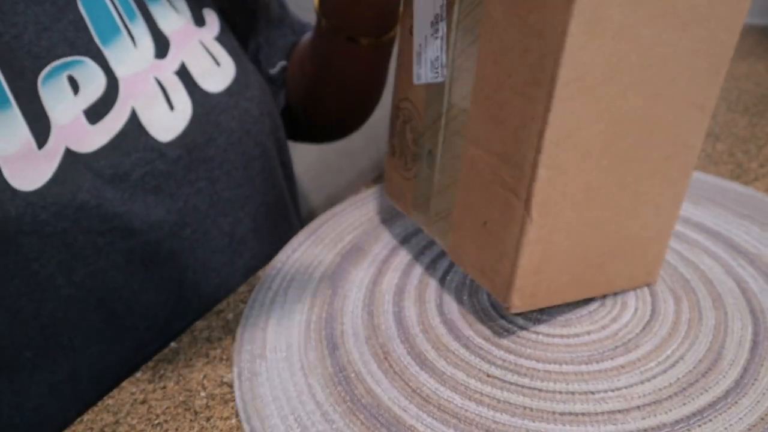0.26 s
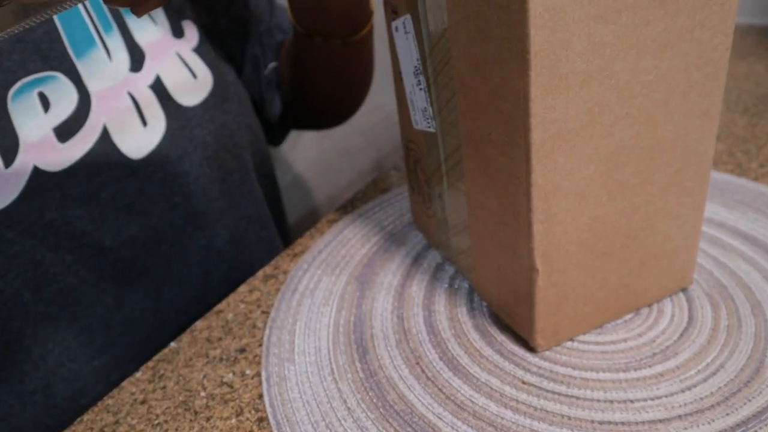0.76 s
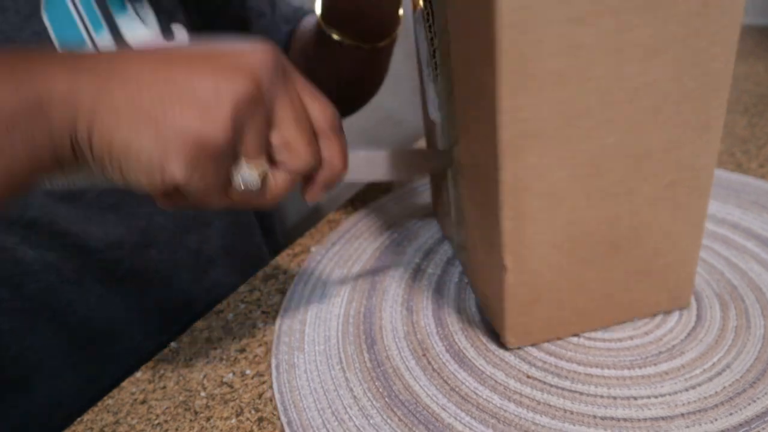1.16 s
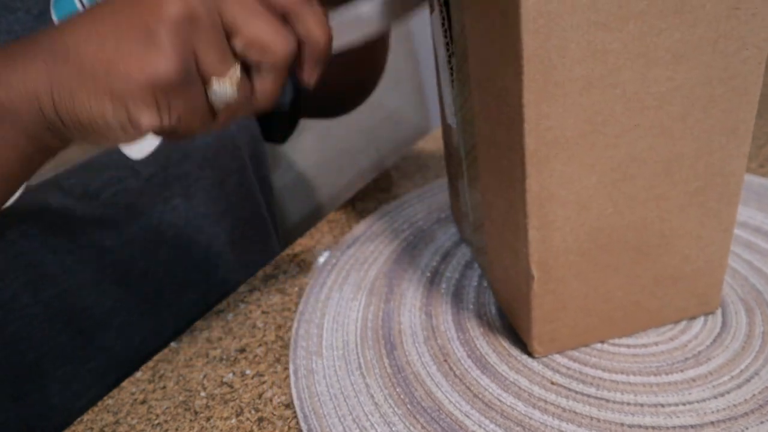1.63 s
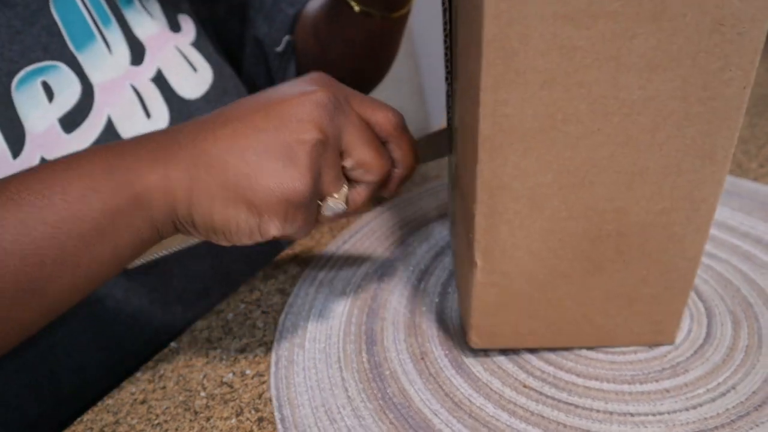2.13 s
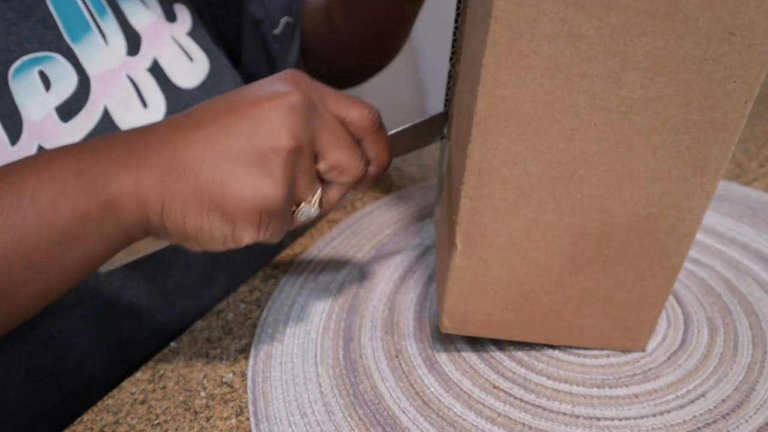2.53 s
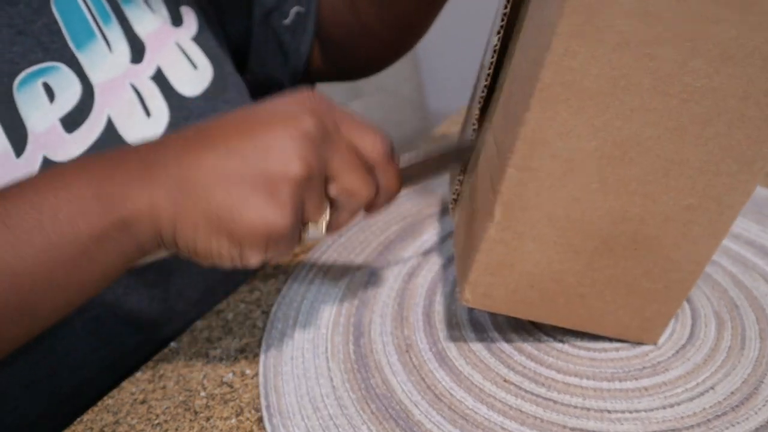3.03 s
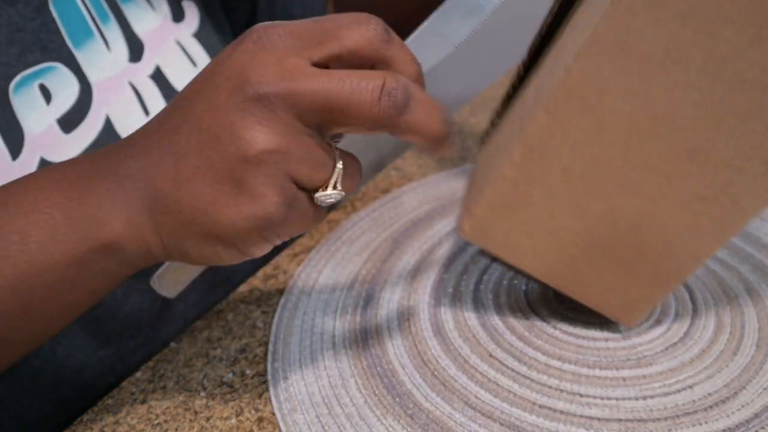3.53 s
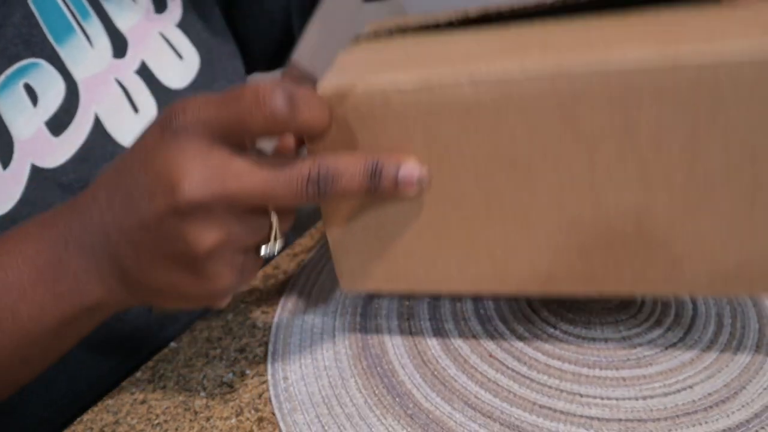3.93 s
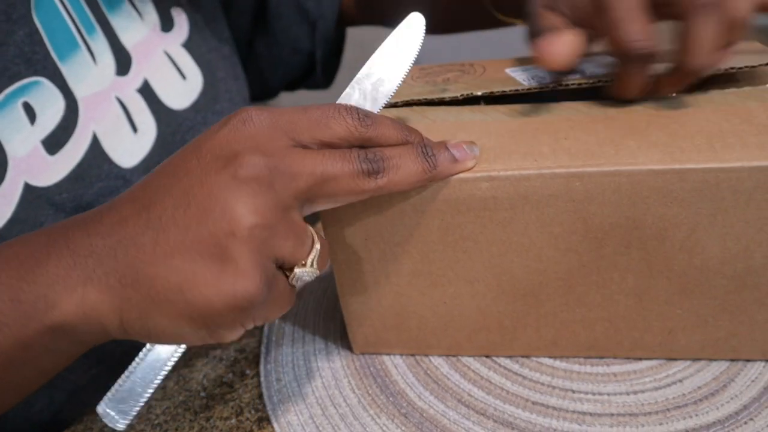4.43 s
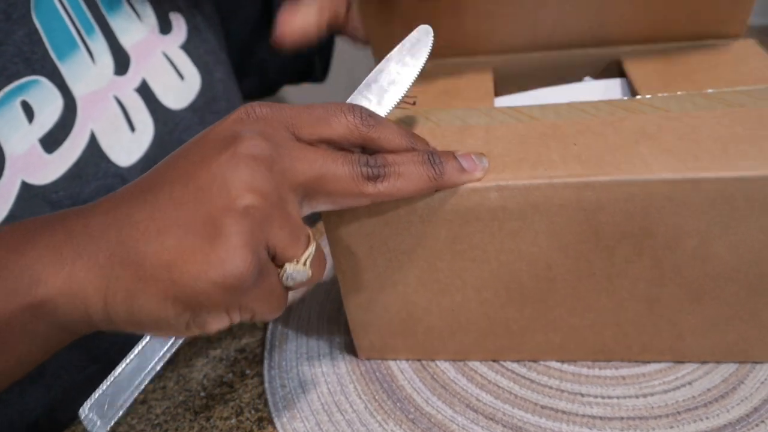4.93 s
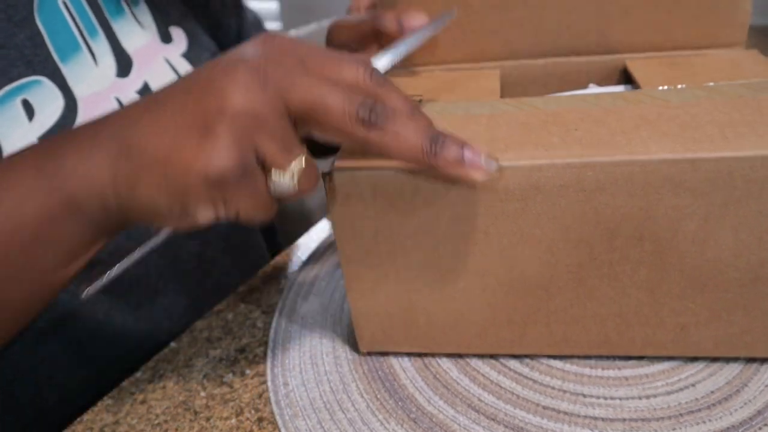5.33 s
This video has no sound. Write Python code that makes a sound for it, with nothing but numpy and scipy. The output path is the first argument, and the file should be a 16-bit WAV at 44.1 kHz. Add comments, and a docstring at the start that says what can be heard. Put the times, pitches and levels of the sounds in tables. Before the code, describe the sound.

Close cardboard rasping, tape crackling and hollow knocks as a box is cut open on a table and its flaps pried up.

```python
"""A cardboard box on a table mat has its packing tape slit with a knife, is laid down and pulled open.
Rubbing and knocks make the air inside and the card walls ring, and the box thuds on the table.
On top come the card's rasp and grainy swells, while the tape's glue and fibres crackle and snap.
The room is small and furnished; a close stereo microphone overloads on the hardest blows."""
import sys
import numpy as np
from scipy import signal
from scipy.fft import rfft, irfft, next_fast_len
from scipy.io import wavfile

SR = 44100
rng = np.random.default_rng(int(sys.argv[2]) if len(sys.argv) > 2 else 0)


def transcribe(u):
    """Save the signal u as a 16-bit wav file named by the first command-line argument.

    u: samples, shape (n,) or (channels, n), limited to [-1, 1]; the rate is SR.
    q: integer samples, one column per channel.
    """
    v = np.clip(np.atleast_2d(u).T, -1, 1)
    q = np.round(v * 32767).astype(np.int16)
    wavfile.write(sys.argv[1], SR, q)


N = 246519

# Tones of the hollow inside the box: pitch_hz, level_db, ring_s (time to fade by 60 dB)
HOLLOW_TONES = [(117, -15.5, 0.11), (157.3, -12.5, 0.19), (218.2, -5, 0.44), (292.7, 0, 0.17),
                (297, 8, 0.068), (356, 4.5, 0.016), (427, -6.5, 0.023)]
# Tones of the card walls: pitch_hz, level_db, ring_s
WALL_TONES = [(553, 8.5, 0.026), (612, -8, 0.054), (686, 8.5, 0.035), (815, 7.5, 0.028), (871, 7, 0.022),
              (978.4, 8.5, 0.022), (1229, -0.5, 0.033), (1097, 5, 0.014), (1391, -3, 0.025),
              (2300, -7.5, 0.072)]


def from_db(db):
    """Turn decibels into a number to multiply by."""
    return 10 ** (np.asarray(db) / 20)


def rms_one(x):
    """Scale a sound so that its average level (rms) is 1."""
    return x / np.sqrt(np.mean(x ** 2) + 1e-20)


def colour(x, curve, lag_s=0):
    """Turn lows and highs up or down along a curve of (pitch_hz, level_db); delay by lag_s."""
    size = next_fast_len(N + SR // 2)
    hz = np.arange(1, size // 2 + 2) * SR / size
    curve_hz, curve_db = np.transpose(curve)
    gain = from_db(np.interp(np.log(hz), np.log(curve_hz), curve_db))
    delay = np.exp(-2j * np.pi * hz * lag_s)
    return irfft(rfft(x, size) * gain * delay, size)[..., :N]


def cut(x, side, hz):
    """Filter a sound, keeping the "low" or the "high" side of hz."""
    return signal.sosfilt(signal.butter(2, hz, side, fs=SR, output="sos"), x)


def ring(force, hz, ring_s):
    """Each push starts a tone that dies away."""
    decay = from_db(-60 / (max(ring_s, .002) * SR))
    turn = 2 * np.pi * hz / SR
    return signal.lfilter([0, np.sin(turn)], [1, -2 * decay * np.cos(turn), decay ** 2], force + 1e-18)


def slips(per_s, spread_db, clump_db, clump_hz):
    """Surfaces stick and slip, making uneven clicks that come in clumps."""
    sizes = from_db(spread_db * np.minimum(rng.exponential(1, N), 4)) * rng.choice([-1, 1], N)
    clicks = sizes * (rng.random(N) < per_s / SR)
    smooth = np.exp(-2 * np.pi * clump_hz / SR)
    drift = signal.lfilter([1], [1, -2 * smooth, smooth ** 2], rng.standard_normal(N + SR))[SR:]
    return rms_one(clicks * from_db(clump_db * rms_one(drift)))


def burst(noise, start_s, peak_db, hz, spread):
    """Keep the noise from about hz / spread to hz * spread and place it at its start time."""
    band = signal.butter(2, [hz / spread, min(hz * spread, SR / 2.5)], "band", fs=SR)
    sound = signal.lfilter(*band, noise)
    sound *= from_db(peak_db) / np.abs(sound).max()
    return np.pad(sound, ((0, 0), (round(start_s * SR), N)))[:, :N]


def struck(start_s, strength_db, tones, ring_share, soft_hz):
    """Blows ring every tone unevenly; the gripping hand cuts the ring time to ring_share."""
    starts = np.round(start_s * SR).astype(int)
    scatter_db = 2.5 * rng.standard_normal((len(starts), len(tones)))
    out = np.zeros(N)
    for k, (hz, db, ring_s) in enumerate(tones):
        lag = round(0.31 / hz * SR)   # a tone answers 0.31 of a cycle late
        clicks = np.zeros(N)
        clicks[starts + lag] = from_db(strength_db + db + scatter_db[:, k])
        out += ring(clicks, hz, ring_s * ring_share)
    return cut(out, "low", soft_hz)   # soft card dulls the blow


def room_tone():
    """The steady air of the house, alike left and right in the bass."""
    # Colour of the air: pitch_hz, level_db
    air_curve = [(15, -46), (25, 5.5), (68, 5.5), (134, 1), (262, 7), (631, -6), (1200, -26), (12000, -52),
                 (14000, -95)]
    middle, side = rng.standard_normal((2, N))
    side = colour(side, [(100, -25), (1000, -6), (8000, 0)])
    return from_db(-38.5) * rms_one(colour(middle + side * np.array([[1], [-1]]), air_curve))


def stroke_levels():
    """Each stroke swells, sags and fades. Gives dB over time for hollow, walls, rasp and crackle."""
    # Strokes of blade or hand: start_s, swell_s, hold_s, walls_db, hollow_vs_walls_db, crackle_vs_walls_db
    strokes = [(0.0, 0.00035, 0.0074, -35.5, 3.5, -3.5), (0.273, 0.011, 0.2, -38.5, -9, -5.5),
               (0.436, 0.1, 0.003, -28.5, -5, -6), (0.739, 0.063, 0.036, -44, 9, 0),
               (0.932, 0.023, 0.054, -38, 9, 5.5), (1.111, 0.02, 0.017, -14.5, 3, -4),
               (1.225, 0.024, 0.12, -24.5, -8, -7.5), (1.435, 0.021, 0.011, -39, 7, -11.5),
               (1.546, 0.049, 0.2, -59.5, -9, 15), (1.696, 0.12, 0.14, -22, 0, -5.5),
               (2.122, 0.038, 0.08, -34, -3, -7), (2.326, 0.028, 0.077, -35.5, -1, -7),
               (2.535, 0.027, 0.0057, -22, -10, -7), (2.651, 0.015, 0.086, -20, -2, -22.5),
               (2.733, 0.065, 0.026, -24, -14, -16), (2.975, 0.0038, 0.038, -33.5, 12.5, -21),
               (3.023, 0.051, 0.098, -21, 1, -5.5), (3.22, 0.014, 0.062, -30, -1, -15.5),
               (3.305, 0.13, 0.14, -34, 4, -6), (3.758, 0.015, 0.087, -34.5, 5, -6.5),
               (3.922, 0.05, 0.25, -35, 6, -6), (4.069, 0.014, 0.033, -24, 5, -11.5),
               (4.232, 0.084, 0.2, -29, 3, -7.5), (4.425, 0.12, 0.15, -28, -1, -13),
               (4.655, 0.063, 0.11, -35, 3.5, -5), (4.899, 0.028, 0.082, -27.5, -3, -3),
               (5.059, 0.013, 0.0086, -26, -2.5, -10), (5.189, 0.0065, 0.14, -52.5, -17, 11),
               (5.299, 0.024, 0.12, -33.5, -2, -1.5), (5.527, 0.035, 0.13, -37, 0, -4)]
    # Hands never lie quite still: hollow_db, walls_db, rasp_db, crackle_db
    resting_db = [-73, -48.5, -51.5, -62]
    swell_db, sag_db_per_s, fade_db_per_s = 19, 47.5, 199
    start_s, swell_s, hold_s, walls_db, hollow_vs_walls_db, crackle_vs_walls_db = np.transpose(strokes)
    steps = np.arange(0, N + 64, 64)   # one level every 64 samples
    since_peak_s = steps / SR - (start_s + swell_s)[:, None]
    held_s = np.clip(since_peak_s, 0, hold_s[:, None])
    shape_db = swell_db * np.minimum(since_peak_s, 0) / np.maximum(swell_s, .003)[:, None]
    shape_db -= sag_db_per_s * held_s
    shape_db -= fade_db_per_s * np.maximum(since_peak_s - held_s, 0)
    rasp_db = walls_db - 4 + 0.26 * crackle_vs_walls_db   # the rasp partly follows the crackle
    peaks_db = np.array([walls_db + hollow_vs_walls_db, walls_db, rasp_db, walls_db + crackle_vs_walls_db])
    powers = from_db(2 * peaks_db) @ from_db(2 * shape_db) + from_db(2 * np.array(resting_db))[:, None]
    return [np.interp(np.arange(N), steps, 10 * np.log10(power)) for power in powers]


def rubbing(tones, level_db, per_s, spread_db):
    """Rubbing rings the box; each tone sits elsewhere on the card, so slips reach it at its own time."""
    force = slips(per_s, spread_db, clump_db=2.2, clump_hz=35)
    sound = 0
    for shift, (hz, db, ring_s) in zip(rng.integers(0, 60, len(tones)), tones):
        sound += from_db(db) * rms_one(ring(np.roll(force, shift), hz, ring_s))
    return from_db(level_db) * rms_one(sound)


def seam_clicks(curve, per_s, spread_db, width):
    """Tiny clicks in short tufts, spread left and right along the taped seam."""
    middle, ends = (slips(per_s, spread_db, clump_db=2.8, clump_hz=70) for _ in range(2))
    return rms_one(colour(middle + width * ends * np.array([[1], [-1]]), curve))


def card_rasp(level_db):
    """The surface of the card rasps as blade or hand drags over it."""
    # Colour of the rasp: pitch_hz, level_db
    rasp_curve = [(700, -58), (1200, 0), (2000, -1.5), (3200, -7.5), (5000, -14), (9000, -31.5)]
    return from_db(level_db) * seam_clicks(rasp_curve, per_s=1500, spread_db=2, width=0.98)


def tape_crackle(level_db):
    """Glue and fibres let go in thousands of bright clicks."""
    # Colour of the crackle: pitch_hz, level_db
    crackle_curve = [(500, -24), (2000, 7.5), (4500, 7), (7000, -5), (10500, 4), (12300, 2), (15000, -22)]
    return from_db(level_db) * seam_clicks(crackle_curve, per_s=3000, spread_db=3, width=0.54)


def snaps():
    """Tape or fibre snaps: one sharp crack with a short, faint fizz behind it."""
    # Dry snaps: start_s, level_db, pitch_hz, left_vs_right_db
    cracks = [(0.087, -28, 6050, 0), (0.2944, -12, 3740, -8), (0.5275, -10, 9000, 15),
              (0.7387, -19.5, 9700, 2), (0.7822, -30, 11000, 4), (0.913, -1, 7200, -4.5),
              (1.106, -7, 8000, -3.5), (1.1238, -1.5, 4080, -4), (1.129, 1.5, 5500, -3),
              (1.136, -1, 6500, 8), (1.141, -17, 6000, 5), (1.479, -18.5, 2330, -2), (1.71, -14, 2700, 3),
              (1.797, -10, 2340, 5), (1.831, -2.5, 9200, 16), (1.845, -8.5, 4000, 4),
              (1.857, -5.5, 9150, -1), (1.9518, -18, 2840, -1), (2.166, -21, 10900, -3),
              (2.2196, -7.5, 10270, 9), (2.2357, -5, 10300, 9), (2.3523, -2.5, 10900, 12),
              (2.565, -6, 2030, -4), (2.598, -7, 2560, -5), (2.6345, -5, 2830, -1.5),
              (2.809, -11, 4300, -5), (2.9897, -15, 2850, 2), (3.3751, -12, 10700, 8),
              (3.3935, -14, 11000, 0), (3.8974, -26, 2800, 6), (4.307, -11, 6200, -12),
              (4.721, -27, 11000, 3), (4.9285, 2.5, 2100, 0.5), (4.9295, 5, 8100, -5),
              (5.203, -9.5, 2630, -1), (5.2016, -7, 7330, -10), (5.443, -18.5, 5950, -1)]
    crack_s, fizz_s, fizz_db = .0012, .02, -28
    out, t = 0, np.arange(2000) / SR
    fade = from_db(-60 * t / crack_s) + from_db(fizz_db - 60 * t / fizz_s)
    noises = rng.standard_normal((len(cracks), len(t)))
    noises[:, 0] = 1.63   # every snap opens with a firm click
    for (start_s, db, hz, pan_db), noise in zip(cracks, noises):
        pan = from_db([[pan_db / 2], [-pan_db / 2]])
        out += burst(noise * pan * fade, start_s, db, hz, spread=1.6)
    return out


def grainy_swells():
    """Short swells of grainy noise; some lead straight into loud snaps."""
    # Swells of noise: start_s, level_db, pitch_hz, length_s
    swells = [(0.2825, -21, 1500, 0.034), (0.292, -35, 5470, 0.012), (0.516, -18.5, 2430, 0.025),
              (0.667, -26.5, 1450, 0.04), (0.744, -24.5, 910, 0.026), (1.118, -2.5, 3770, 0.028),
              (1.134, -19, 8550, 0.059), (1.341, -19, 2400, 0.041), (1.355, -21, 6700, 0.018),
              (1.71, -11.5, 1040, 0.0034), (1.821, -11, 2360, 0.046), (1.827, -16, 5000, 0.015),
              (1.891, -16, 2310, 0.027), (2.34, -23, 1190, 0.041), (2.555, -9.5, 2180, 0.017),
              (3.066, -17, 8900, 0.063), (3.154, -15.5, 1170, 0.024), (3.155, -21, 8000, 0.021),
              (3.5088, -20, 2750, 0.021), (3.51, -25, 8500, 0.023), (3.7695, -23, 1460, 0.036),
              (4.078, -26, 1780, 0.036), (4.2927, -21.5, 2100, 0.047), (4.407, -19, 1050, 0.015),
              (4.563, -25.5, 9200, 0.08), (4.919, -8.5, 2360, 0.021), (5.063, -21, 2100, 0.011),
              (5.075, -15.5, 2100, 0.014), (5.3294, -17.5, 2140, 0.018)]
    out, t = 0, np.arange(4000) / SR
    for start_s, db, hz, length_s in swells:
        noise = rng.standard_normal((3, len(t)))   # shared, left, right
        grainy = (noise[0] + .5 * noise[1:]) * np.abs(noise[0])
        swell = np.sin(np.pi * np.minimum(t / length_s, 1))
        out += burst(grainy * swell, start_s, db, hz, spread=1.5)
    return out


def table_thuds():
    """The box bumps the table, which answers with low, dull tones."""
    # Bumps on the table: start_s, level_db
    bumps = [(0.291, -12.5), (0.368, -20), (1.127, -7), (1.371, -14), (1.858, -13), (1.958, -27),
             (3.195, -14.5), (4.091, -6), (5.328, -10.5)]
    # Tones of the table: pitch_hz, level_db, ring_s
    table_tones = [(51.7, 4, 0.061), (192, 4.5, 0.19), (120.6, 1.5, 0.098)]
    start_s, level_db = np.transpose(bumps)
    return struck(start_s, level_db - 8, table_tones, ring_share=0.48, soft_hz=245)


def knocks():
    """Knocks and slips jolt the box, ringing its hollow and its walls together."""
    # Jolts of the box: start_s, level_db, extra_walls_db
    jolts = [(0.297, -4.5, -4.5), (0.37, -11, -20), (0.515, -8.5, -31), (0.526, -5, -26),
             (0.559, -1.5, -44), (0.607, -16, -3), (0.795, -9.5, -29), (0.956, -4, -22), (1.118, 2, -31),
             (1.157, -13, 0), (1.217, 6.5, -11), (1.443, -6.5, -8), (1.711, -2.5, -2.5), (1.744, -1.5, -23),
             (1.846, 2.5, -1.5), (1.8572, 4.5, -33), (1.9016, 6, -11), (1.953, -1.5, -3.5),
             (2.157, -14, -3), (2.5644, 9, -5.5), (2.6, 8, -4), (2.6037, 5.5, -15), (2.6337, 2.5, -1.5),
             (2.6372, 2.5, 4), (2.794, -5, 1.5), (2.985, -4.5, -9.5), (3.013, -2.5, -33), (3.054, -10, 8),
             (3.068, -5, -20), (3.133, -10, -25), (3.156, -2, -1), (3.191, -3, -8), (3.426, -7, -17),
             (3.744, -7, -20), (3.775, -7, -7.5), (4.089, 2.5, -25), (4.115, -3, 0), (4.38, -19, -10),
             (4.557, -9, -33), (4.9304, 0, -3), (4.939, -7, -9), (5.0017, -8, 4), (5.097, -7, 2.5),
             (5.335, -3.5, -6.5), (5.4449, -14, 10)]
    start_s, level_db, extra_walls_db = np.transpose(jolts)
    hollow = struck(start_s, level_db - 17, HOLLOW_TONES, ring_share=0.26, soft_hz=584)
    walls = struck(start_s, level_db + extra_walls_db - 20.5, WALL_TONES, ring_share=0.79, soft_hz=1770)
    return cut(hollow + walls, "high", 170)   # the knocks keep clear of the deep bass


def stereo_width(direct):
    """A slightly smeared copy, opposite in sign left and right, widens the sound."""
    # Colour of the widening copy: pitch_hz, level_db
    width_curve = [(60, -46), (150, -52), (380, -20), (950, -11), (2380, -94), (5980, 7), (15000, -7.5)]
    side = direct.mean(axis=0)
    for lag in (3, 7, 13):   # in samples; each pass smears the sound but keeps its colour
        smear = np.zeros(lag + 1)
        smear[[0, lag]] = 1, .6
        side = signal.lfilter(smear[::-1], smear, side)
    return colour(side, width_curve) * np.array([[1], [-1]])


def room_echoes(direct, ring_s):
    """The room adds a faint tail of dense echoes, different in each ear."""
    # Colour of the tail against the direct sound: pitch_hz, level_db
    tail_curve = [(150, -27), (1000, -9), (4000, -17), (10000, -13)]
    t = np.arange(SR // 3) / SR
    echoes = rng.standard_normal((2, len(t))) * from_db(-60 * t / ring_s)
    echoes /= np.sqrt(np.sum(echoes ** 2, axis=1, keepdims=True))
    return colour(signal.fftconvolve(direct, echoes, axes=1)[:, :N], tail_curve)


def scene():
    """Add up the box, the table and the tape, widen them, then add the room's echoes and air."""
    hollow_db, walls_db, rasp_db, crackle_db = stroke_levels()
    box = rubbing(HOLLOW_TONES, hollow_db, per_s=900, spread_db=2.5)
    box += rubbing(WALL_TONES, walls_db, per_s=3000, spread_db=3.5)
    box = cut(box + knocks(), "high", 100)   # the box's rubbing and knocks stay above the deep bass
    direct = box + table_thuds() + snaps() + grainy_swells()
    direct += card_rasp(rasp_db) + tape_crackle(crackle_db)
    return direct + stereo_width(direct) + room_echoes(direct, ring_s=.28) + room_tone()


def record(dry):
    """The microphone's two sides differ in colour and timing; peaks clip and the top treble is cut."""
    # Lean of the microphone: pitch_hz, left_vs_right_db
    lean = [(180, 0), (550, -3.5), (1650, -2.5), (4970, -2), (15000, 0.5)]
    low_hz, high_hz, cutoff_hz = 46, 14000, 16300
    left = colour(dry[0], [(hz, db / 2) for hz, db in lean], lag_s=.00005)
    right = colour(dry[1], [(hz, -db / 2) for hz, db in lean])
    mic_range = signal.butter(4, [low_hz, high_hz], "band", fs=SR, output="sos")
    clipped = np.clip(signal.sosfilt(mic_range, [left, right]), -1, 1)
    treble_cut = signal.cheby2(12, 70, cutoff_hz, fs=SR, output="sos")
    return np.clip(signal.sosfilt(treble_cut, clipped), -1, 1)


dry = scene()
out = record(dry)
transcribe(out)
```